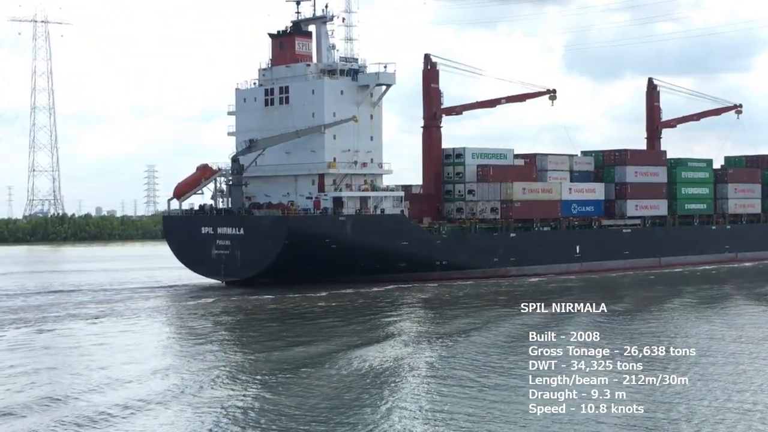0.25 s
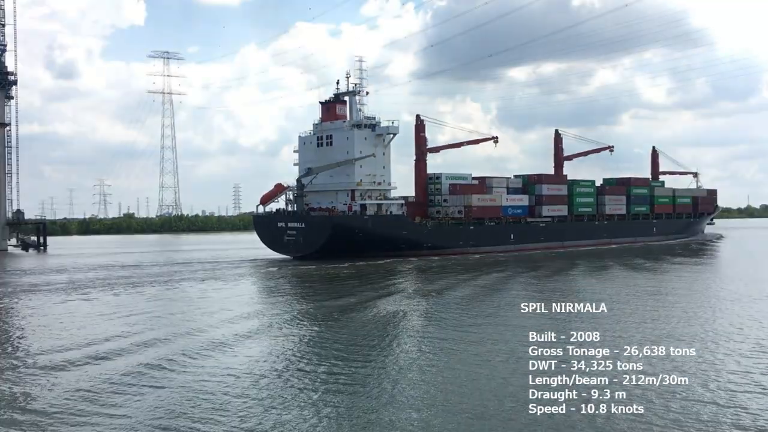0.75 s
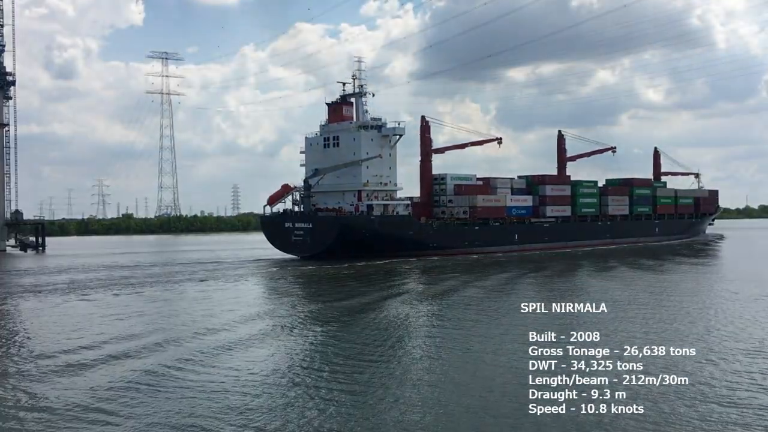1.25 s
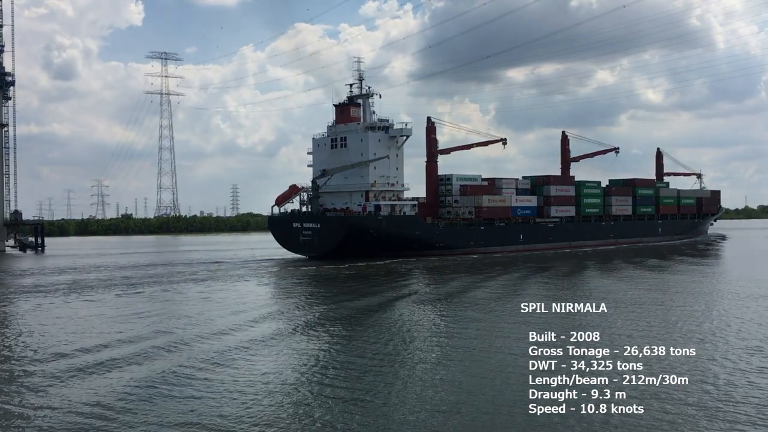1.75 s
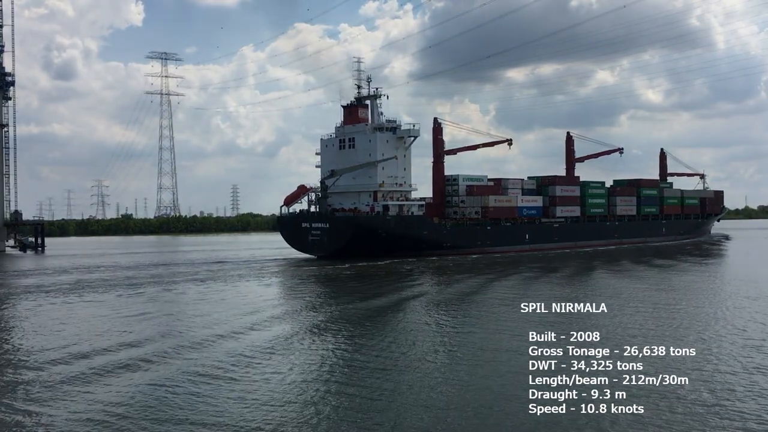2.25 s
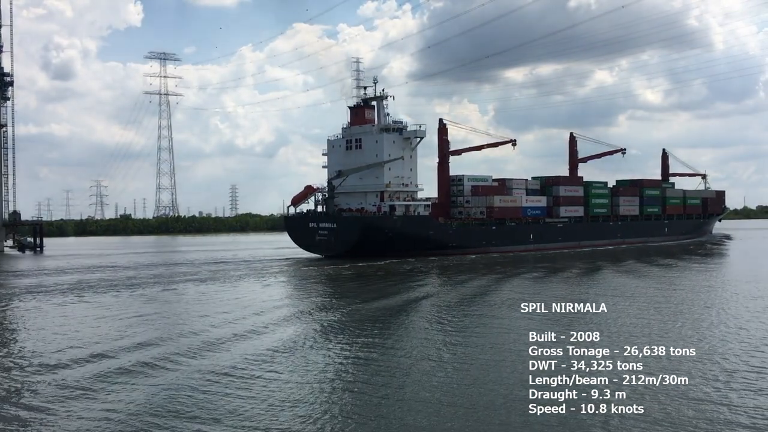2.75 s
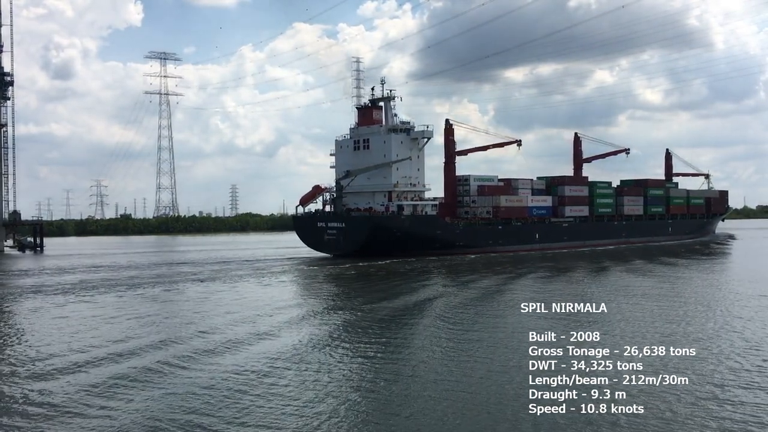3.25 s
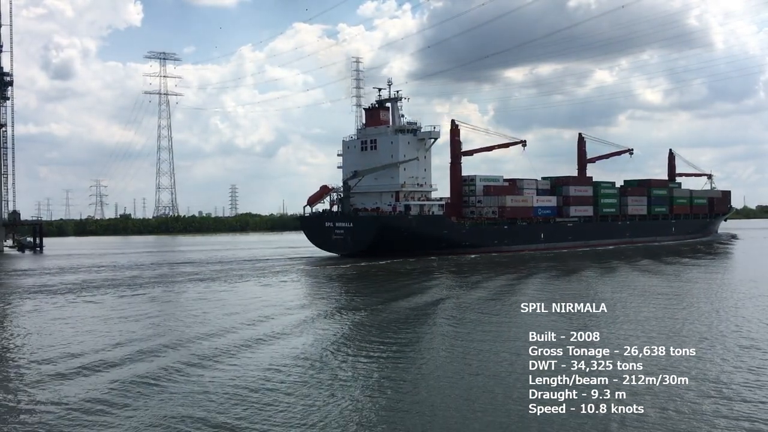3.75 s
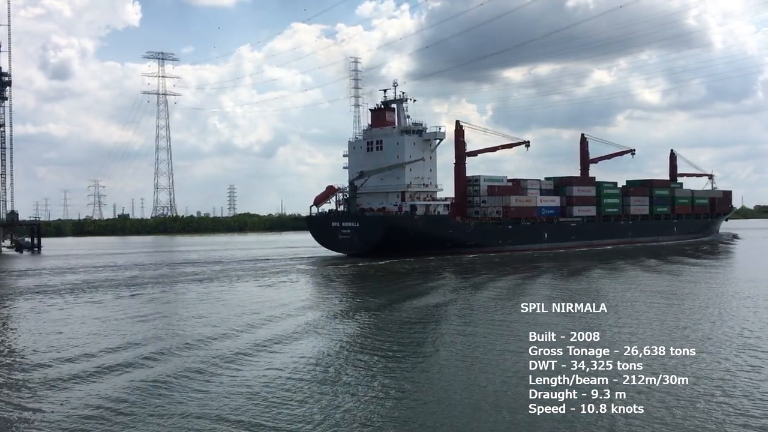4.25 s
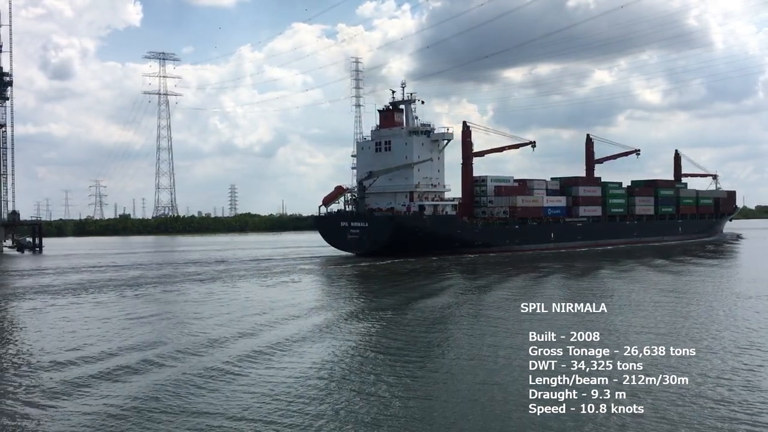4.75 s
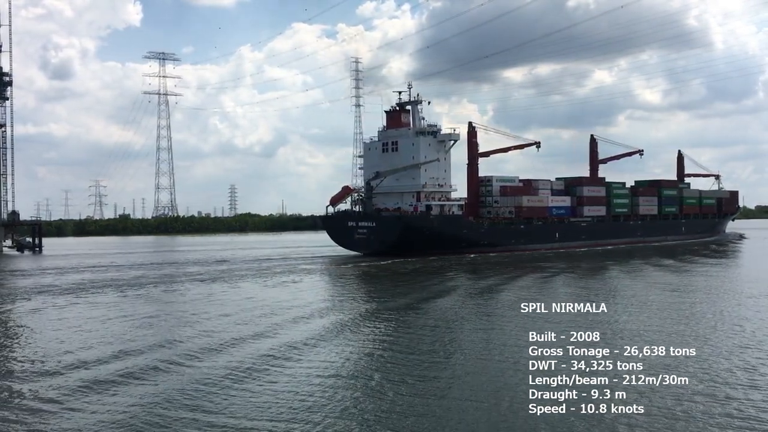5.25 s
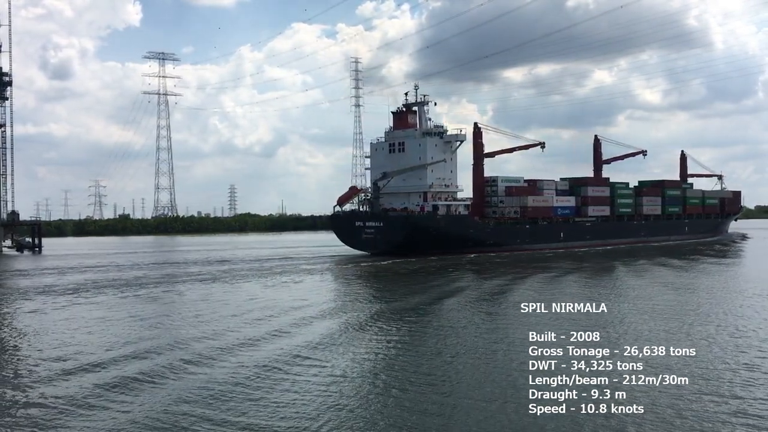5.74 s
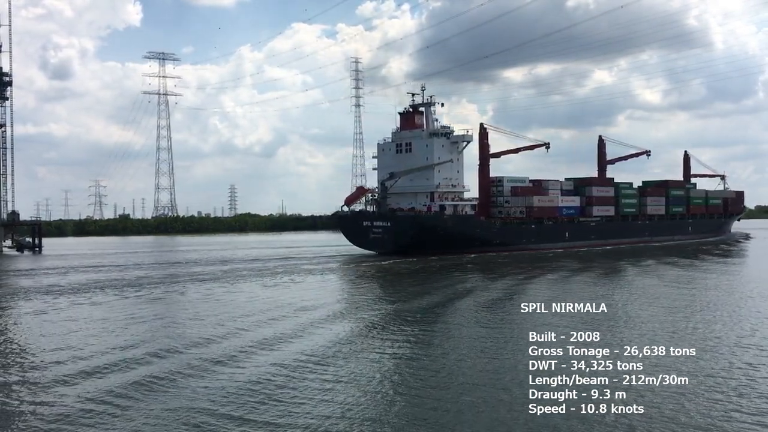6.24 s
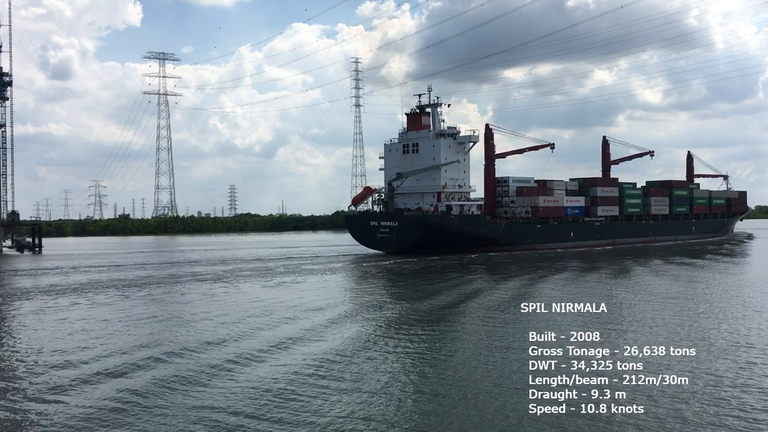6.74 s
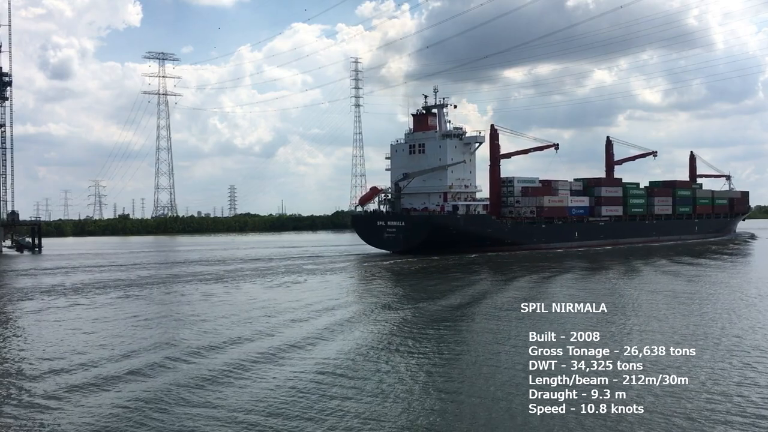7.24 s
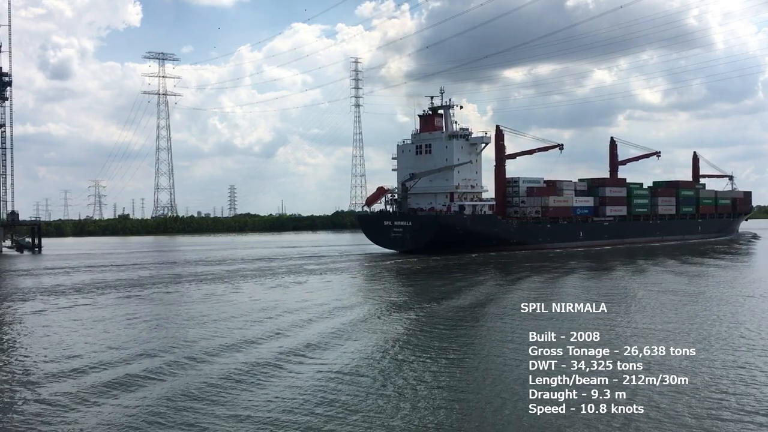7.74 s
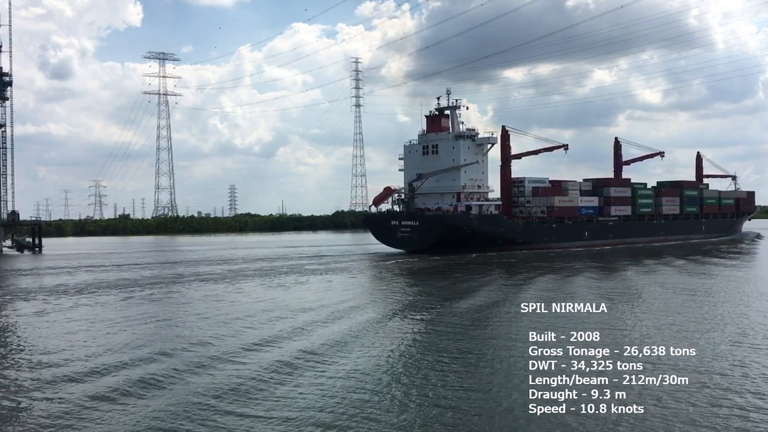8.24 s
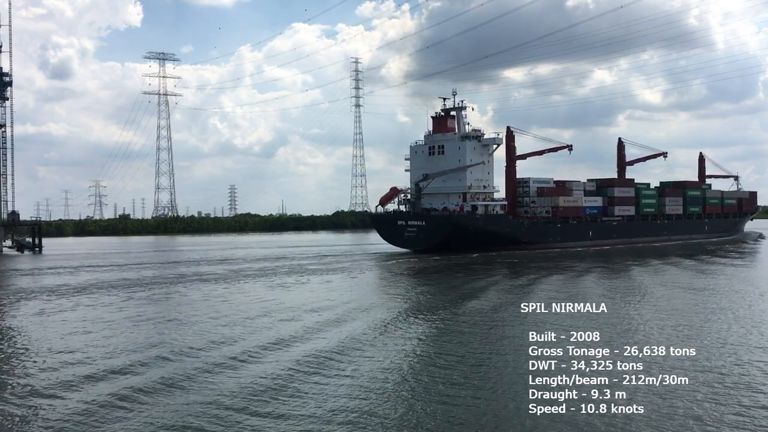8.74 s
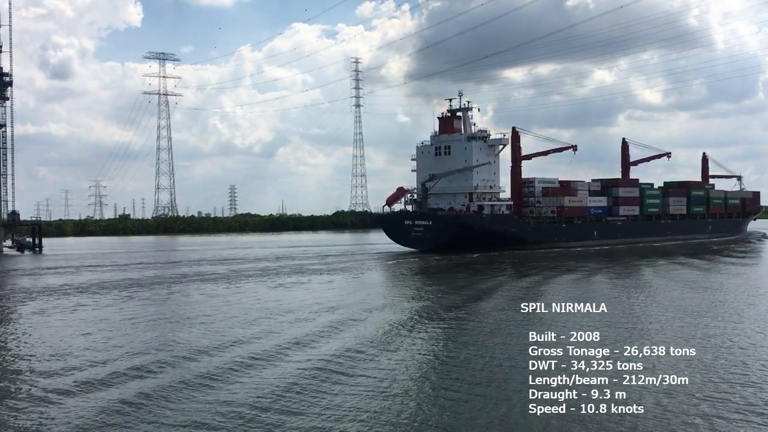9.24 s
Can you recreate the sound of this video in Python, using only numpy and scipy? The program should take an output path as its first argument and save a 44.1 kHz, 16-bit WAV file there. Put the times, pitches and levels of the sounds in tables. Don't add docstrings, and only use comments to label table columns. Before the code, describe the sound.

A wide open river, heard from the bank. From 0 s a cargo ship's slow diesel throbs low and steady, with generator hum, a wavering exhaust drone, low patchy water wash and a faint bright spray hiss. A tiny tick comes close to the microphone at 0.8 s. At about 0.9 s the deep air horn starts quickly with a small surge and holds one unbroken, very low note near 93 Hz. It begins muffled, then from 2 to 6 s grows steadily brighter, buzzier and brassier, individual overtones glinting and dimming. The background dips slightly beneath it. Faint ticks fall around 1.6-1.9, 5.1 and 7.9-8.2 s, with stronger knocks at 3.8 and 6.1 s. Dull, bassy bank echoes thicken the note. At about 9 s the horn stops, its lowest tones last; echoes fade within half a second over engine and water until about 9.5 s.

```python
import sys
import numpy as np
from scipy import signal
from scipy.io import wavfile

SR = 44100
rng = np.random.default_rng(int(sys.argv[2]) if len(sys.argv) > 2 else 0)


def transcribe(signal):
    frames = np.atleast_2d(signal).T
    limited = np.clip(frames, -1, 1)
    pcm = np.round(limited * 32767).astype(np.int16)
    wavfile.write(sys.argv[1], SR, pcm)


def gain_from_db(level_db):
    decades = np.asarray(level_db, float) / 20
    return 10 ** decades


N = 418509

HORN_HZ = 92.67
VALVE_OPEN_S, VALVE_SHUT_S = 0.876, 8.97


def rms_one(x):
    return x / np.sqrt(np.mean(x ** 2) + 1e-20)


def in_time(rows):
    s, *columns = np.transpose(rows)
    return [np.interp(np.arange(N) / SR, s, column) for column in columns]


def drift(rate_hz):
    r = np.exp(-200 * np.pi * rate_hz / SR)
    slow = signal.lfilter([1], [1, -2 * r, r * r], rng.standard_normal(N // 100 + 2002))
    slow = slow[2000:]
    slow = rms_one(slow - slow.mean())
    return np.interp(np.arange(N) / 100, np.arange(len(slow)), slow)


def banded_noise(spectrum, patchy_db):
    hz, db = np.transpose(spectrum)
    edges = hz[0] * 2 ** np.arange(0, np.log2(hz[-1] / hz[0]), 1 / 4)
    white = rng.standard_normal((2, N))
    together = drift(2.8)
    out = 0
    for k, (low, high) in enumerate(zip(edges, edges[1:])):
        sos = signal.butter(3, [low, high], "band", fs=SR, output="sos")
        band = signal.sosfilt(sos, white[k % 2])
        level_db = np.interp(np.log(low * high) / 2, np.log(hz), db)
        flicker_db = patchy_db * (0.5 * together + drift(16.0))
        out = out + band * gain_from_db(level_db + flicker_db)
    return rms_one(out)


def main_engine():
    # time in seconds, working cycle in Hz.
    cycle_hz = [
        (0, 7.461),
        (9.49, 7.453),
    ]
    # order of the cycle [ratio], level in dB, change while passing in dB per s.
    orders = [(5.94, -58, -3.5), (6.93, -49, 0), (7.7, -51.5, 0.5), (9.19, -39, -0.45), (9.95, -44, -0.9),
              (10.87, -37, -1.17), (11.91, -41.5, 1.3), (13.046, -44, -1.25), (14.26, -47.5, 0.8),
              (15.27, -41.5, 0.84), (16.11, -53.5, -1.5), (16.75, -57, 2.5), (22.15, -50, -0.8),
              (22.92, -55, 0), (24.13, -45.5, -0.5), (24.95, -68.5, -5), (27, -70, -2), (29.05, -66, 3.5),
              (31.1, -66, -2.5)]
    t = np.arange(N) / SR
    cycle = 2 * np.pi * np.cumsum(in_time(cycle_hz)[0]) / SR
    out = np.zeros(N)
    for order, db, slope_db in orders:
        level_db = db + slope_db * (t - t.mean()) + 0.8 * drift(0.5)
        out += gain_from_db(level_db) * np.cos(order * cycle + rng.uniform(0, 2 * np.pi))
    return np.sqrt(2) * out


def generator():
    # hum in Hz, level in dB.
    hums = [(36.4, -46), (46.2, -49), (52.6, -46), (61.6, -51), (103.3, -58), (109.3, -50.5), (138.6, -45)]
    t = np.arange(N) / SR
    out = np.zeros(N)
    for hz, db in hums:
        out += gain_from_db(db + 1.5 * drift(0.5)) * np.cos(2 * np.pi * hz * t + 0.8 * drift(0.3))
    return np.sqrt(2) * out


def exhaust():
    # harmonic number, level in dB.
    pipe_harmonics = [(1, -48), (2, -46.5), (3, -48.5), (4, -54), (5, -59.5), (6, -58.5), (7, -60)]
    pipe = 2 * np.pi * np.cumsum(93.99 + 1.1 * drift(1.522)) / SR
    out = np.zeros(N)
    for k, db in pipe_harmonics:
        out += gain_from_db(db + 2.44 * drift(3.4)) * np.cos(k * pipe + 0.76 * drift(2.5))
    return np.sqrt(2) * out


def hull_wash():
    # frequency in Hz, level in dB per Hz.
    wash_spectrum = [(15, -50), (25, -9.5), (59, -10), (87, -16), (136, -24.5), (192, -19), (234, -18.5),
                     (372, -20), (427, -28.5), (560, -24.5), (810, -26), (1420, -30), (2600, -45),
                     (3380, -80.5), (5720, -120)]
    return gain_from_db(-41) * banded_noise(wash_spectrum, patchy_db=-0.57)


def spray_hiss():
    # frequency in Hz, level in dB per Hz.
    hiss_spectrum = [(1500, -9), (2100, -0.5), (2700, -4), (3400, -4), (4200, -9.5), (4900, -10),
                     (5600, -13.5), (6500, -19), (8000, -27), (9800, -28), (12000, -32), (14000, -34.5),
                     (16000, -34), (19500, -36)]
    return gain_from_db(-61.5) * banded_noise(hiss_spectrum, patchy_db=1.13)


def ticks():
    # start in seconds, peak in dB, centre in Hz, decay by 60 dB in seconds.
    near_ticks = [(0.764, -60, 8750, 0.012), (1.583, -63, 8100, .006), (1.69, -69, 9130, 0.0052),
                  (1.853, -63, 8440, 0.014), (3.8197, -57.5, 13300, 0.049), (3.8198, -47.5, 4400, .12),
                  (5.09, -63.5, 9100, 0.0081), (6.107, -60, 9600, 0.0069), (6.112, -52.5, 8960, 0.0044),
                  (7.9, -69, 9050, 0.0095), (8.11, -67, 9840, 0.0078), (8.231, -65, 8700, 0.0087)]
    out, age = np.zeros(N), np.arange(SR // 8) / SR
    for s, db, hz, t60 in near_ticks:
        wide = 1.1 + 9 * t60
        sos = signal.butter(2, [hz / wide, min(hz * wide, 16000)], "band", fs=SR, output="sos")
        burst = rms_one(signal.sosfilt(sos, rng.standard_normal(len(age))))
        start = round(s * SR)
        out[start:start + len(age)] += burst * gain_from_db(db - 4.0 - 60 * age / t60)
    return out


def gain_control():
    t, lean_s = np.arange(N) / SR, 0.39
    since_open, until_free = t - VALVE_OPEN_S, VALVE_SHUT_S + lean_s / 2 - t
    return np.clip(np.minimum(since_open, until_free) / lean_s, 0, 1)


def valve(k):
    t = np.arange(N) / SR
    opened = np.clip((t - VALVE_OPEN_S - 0.0023 * k) / 0.03, 0, 1)
    closed = np.clip((VALVE_SHUT_S + 0.15 / k - 0.0008 * k - t) / (0.017 + 0.089 / k), 0, 1)
    return opened * closed


def pulse_phase(k, hidden):
    lead = 7 / (1 + (k / 2.1) ** 3) - 3.25
    if k == 2:
        lead = lead - 0.8 * (1 - hidden)
    if k > 5:
        lead = lead - 0.4 * np.cos(2 * np.pi * (k + 1) / 3)
    return lead


def moving_bands():
    # time in seconds, centre in Hz, width in Hz, change in dB.
    band_moments = [(1.3, 170, 40, -3), (3.1, 185, 40, -4.5), (3.0, 980, 80, 7.5), (4.2, 2550, 150, 9.5),
                    (5.3, 3000, 300, 9.5), (5.4, 1280, 150, -5), (2.93, 620, 60, -6.5), (2.9, 1400, 240, -9),
                    (3.7, 2040, 210, 12), (4.2, 752, 45, -15), (4.3, 278, 39.9, -3.5), (4.7, 1850, 290, -8.5),
                    (6.1, 2900, 400, 5), (6.7, 1575, 50, -9.5), (7.4, 2600, 80, -8), (8.5, 2570, 150, 9.5),
                    (8.5, 3400, 310, 5.5), (8.8, 1600, 340, -5), (7.3, 230, 40, 2), (2.2, 1600, 100, -4),
                    (6.7, 1200, 200, -3), (8.8, 1020, 50, -4.5), (9.03, 2550, 140, 5), (3.7, 649, 58, 3),
                    (6.4, 3150, 120, 7)]
    t, moment_s = np.arange(N) / SR, 0.33
    moments = [np.exp(-0.5 * ((t - row[0]) / moment_s) ** 2) for row in band_moments]

    def band_db(k):
        total = np.zeros(N)
        for (s, hz, width_hz, depth_db), passing in zip(band_moments, moments):
            total += depth_db * np.exp(-0.5 * ((k * HORN_HZ - hz) / width_hz) ** 2) * passing
        return total

    return band_db


def horn():
    # harmonic number, level in dB.
    in_view = [(1, 0), (4, 0), (5, -6), (6, -12.5), (7, -10), (8, -12.5), (9, -12), (10, -14.5), (11, -15),
               (12, -15), (13, -14.5), (14, -18), (15, -21), (16, -22), (17, -23), (18, -28), (19, -25),
               (20, -28), (21, -29), (22, -32), (23, -36), (24, -38), (25, -37), (26, -39), (27, -36),
               (28, -36), (29, -40), (30, -39)]
    # harmonic number, level in dB.
    off_cargo = [(5, -18), (6, -21), (7, -15), (8, -20), (9, -24), (10, -24), (11, -36), (12, -24),
                 (13, -27), (14, -35), (15, -29), (16, -35), (17, -21.5), (18, -44)]
    # time in seconds, hidden share 0-1.
    deckhouse = [
        (.9, 0.92),
        (1.9, 0.77),
        (2.4, 0.73),
        (3.4, 0.52),
        (4.3, 0.36),
        (5.1, 0.28),
        (5.9, 0.16),
        (6.8, 0.13),
        (7.7, 0.08),
        (8.9, 0.12),
    ]
    body_db = -32
    direct, scattered = dict(in_view), dict(off_cargo)
    hidden = np.clip(in_time(deckhouse)[0], 0, 0.99)
    band_db = moving_bands()
    since_open = np.arange(N) / SR - VALVE_OPEN_S
    surge = np.exp(-np.clip(since_open - 0.1, 0, None) / 0.17)
    cargo_lag_s = 0.13
    early_db = -4.5 * np.clip(1 - (since_open - cargo_lag_s) / (cargo_lag_s / 2), 0, 1)
    cargo_db = body_db + 1 - 26 * (1 - hidden) + early_db
    deepest_shadow_db = 16.5 - 4 * surge
    low_db = {1: -36, 2: -23 - 10 * hidden, 3: -31.5 + 2.5 * hidden}
    cycle = 2 * np.pi * np.cumsum(HORN_HZ + 0.035 * drift(0.6)) / SR
    out = np.zeros(N)
    for k in range(1, 49):
        db = direct.get(k, direct[30] + 1.5 - 0.55 * (k - 30)) + body_db
        db = db + 7.5 * hidden * (k > 17)
        shadow_db = 2.36 * hidden / (1 - hidden) * max(k - 4, 0)
        db = db - np.clip(shadow_db, 0, deepest_shadow_db)
        cargo = gain_from_db(scattered.get(k, -99) + cargo_db)
        gain = np.hypot(gain_from_db(low_db.get(k, db)), cargo)
        smear = rng.uniform(-np.pi, np.pi) * (cargo / gain) ** 2 + 0.03 * min(k, 12) * drift(0.8)
        twinkle_db = 0.1 * min(k, 30) * drift(0.9) * (k / (k + 8))
        surge_db = surge * (0.5 + 0.06 * min(k, 20))
        level = gain * gain_from_db(surge_db + band_db(k) + twinkle_db) * valve(k)
        out += np.sqrt(2) * level * np.cos(k * cycle + pulse_phase(k, hidden) + smear)
    return out


def river_banks(x):
    # lag in seconds, level in dB.
    echoes = [
        (0.0549, -16.5),
        (0.1092, -20),
        (.1735, -19.5),
        (.238, -19.5),
        (.3245, -26),
        (0.431, -27),
    ]
    bass = signal.sosfilt(signal.butter(1, 135, fs=SR, output="sos"), x)
    dull = bass + gain_from_db(-11.5) * x
    out = np.zeros(N)
    for lag_s, db in echoes:
        lag = int(lag_s * SR)
        out[lag:] += gain_from_db(db + 2 * drift(4)[lag:]) * dull[:N - lag]
    return out


def scene():
    ducked = gain_control()
    engines = gain_from_db(0.33 - ducked) * (main_engine() + generator() + exhaust())
    water = gain_from_db(-3 * ducked) * hull_wash() + spray_hiss()
    near = ticks()
    blast = horn()
    return (engines + water + near + blast + river_banks(blast))[None]


def microphone(dry):
    # centre in Hz, width in Hz, share removed 0-1.
    mic_dips = [
        (4870, 500, 0.5),
        (10500, 1000, .5),
    ]
    heard = signal.sosfilt(signal.butter(8, 34, "high", fs=SR, output="sos"), dry)
    for hz, width_hz, share in mic_dips:
        heard = heard - share * signal.lfilter(*signal.iirpeak(hz, hz / width_hz, SR), heard)
    return heard


def roll_off(x):
    return signal.sosfilt(signal.butter(12, 15750, fs=SR, output="sos"), x)


def record(dry):
    heard = microphone(dry)
    return roll_off(heard)


dry = scene()
out = record(dry)
transcribe(out)
```